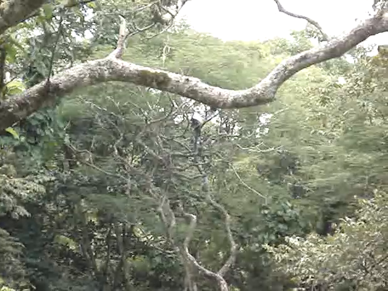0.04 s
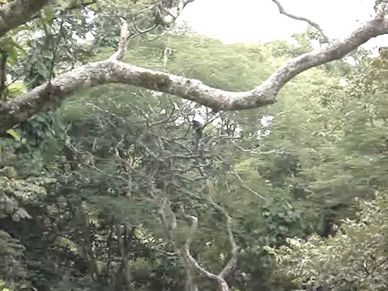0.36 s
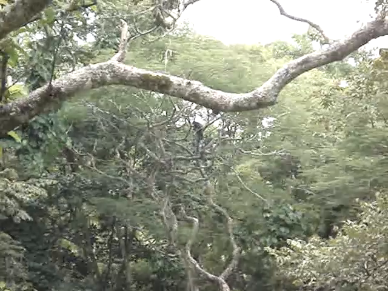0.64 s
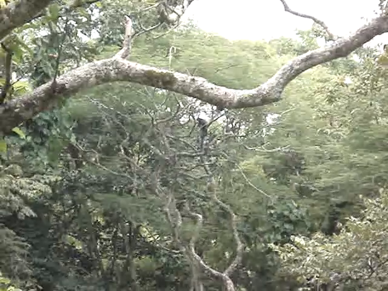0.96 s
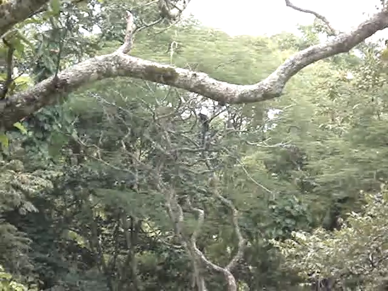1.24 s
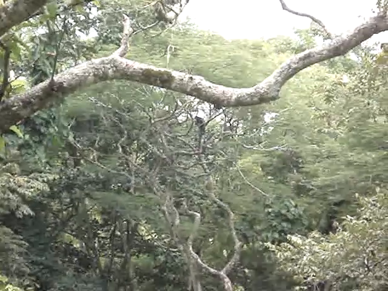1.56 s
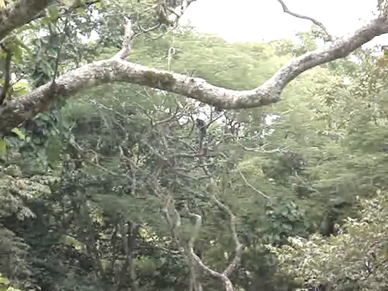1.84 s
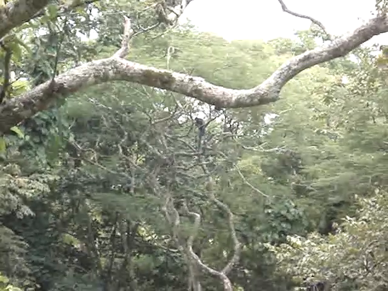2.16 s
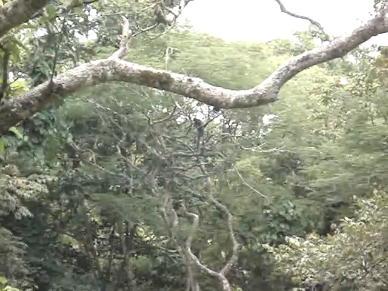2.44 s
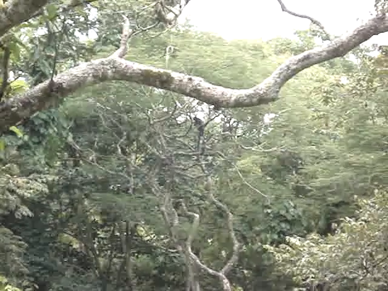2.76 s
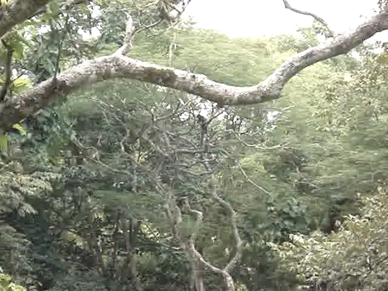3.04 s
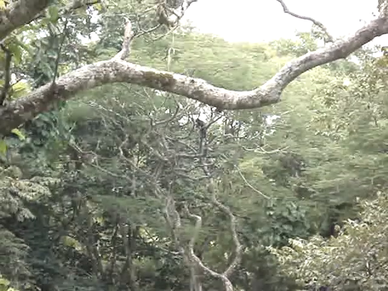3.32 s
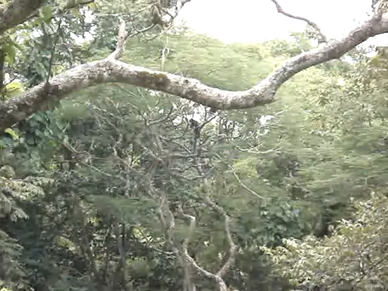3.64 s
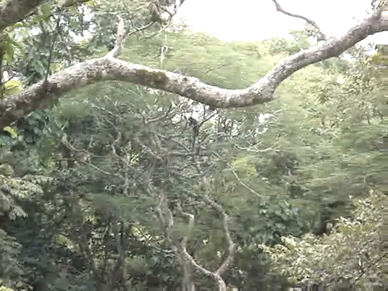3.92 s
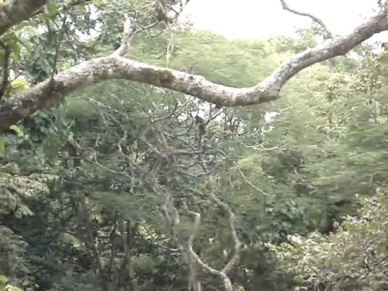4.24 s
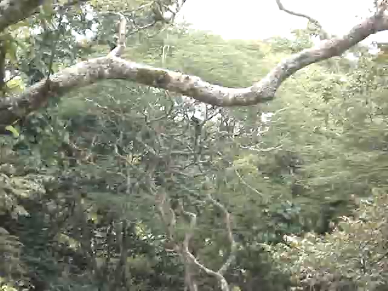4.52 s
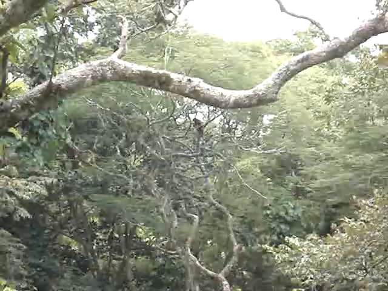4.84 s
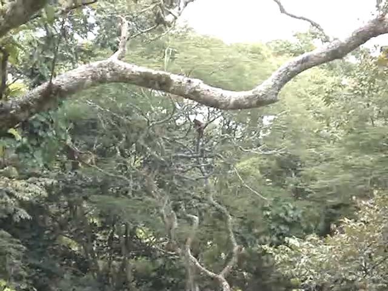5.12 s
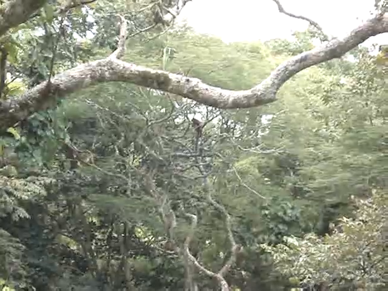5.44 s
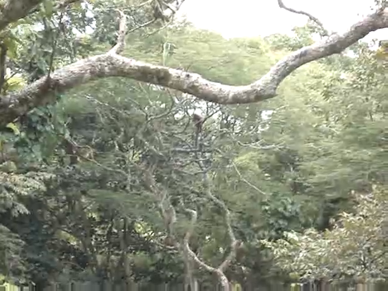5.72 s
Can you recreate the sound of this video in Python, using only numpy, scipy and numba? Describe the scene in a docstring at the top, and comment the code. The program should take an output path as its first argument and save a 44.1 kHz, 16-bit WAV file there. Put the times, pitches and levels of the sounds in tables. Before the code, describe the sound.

A soft, steady forest hiss runs for the whole six seconds, with a very faint low engine drone far away that slowly speeds up. During the first two seconds small birds give quiet, quick, high chirps, and leaves swish briefly around 1 and 2 seconds. Thin whistles follow near 2.4 seconds. At about 2.8 seconds a howler monkey starts roaring from a tree some way off, clearly the loudest sound. Its calls are short, hoarse and raspy, each with a fluttering, hollow boom and a light echo from the trees. The opening pair runs together with a thin high ring; more come at about 3.4, 3.6, 4.0, 4.2 and 4.6 seconds, the last ones slightly lower and rougher. A brighter bird chirp cuts through near 3.7 seconds. The roaring fades by 5 seconds, leaving the hiss, a couple of thin whistles and a last leaf swish.

```python
"""Howler monkey in a forest

A howler gives a bout of hoarse roars from a tree some way off. Its throat sac booms in throbs while
chaotic vocal-fold pulses rasp through the throat and mouth resonances; the trees scatter the sound.
Its mouth adds a thin high ring to the opening roars.
Small birds chirp and whistle, leaves swish, a far engine slowly speeds up, and hiss lies under it all."""
import sys
import numpy as np
from scipy import signal
from scipy.fft import rfft, irfft
from scipy.io import wavfile
from scipy.ndimage import uniform_filter1d
from numba import njit

SR = 44100
rng = np.random.default_rng(int(sys.argv[2]) if len(sys.argv) > 2 else 0)


def unload_audio(sound):
    """Save the sound as a 16-bit wav file, at the path given as the first command line argument."""
    columns = np.transpose(np.atleast_2d(sound))
    # keep every value between -1 and 1, then stretch to whole-number steps
    steps = np.round(np.clip(columns, -1, 1) * 32767)
    wavfile.write(sys.argv[1], SR, steps.astype(np.int16))


N = 263718
TIME_S = np.arange(N) / SR

# forest hiss spectrum: f/Hz, relative density/dB
HISS_SPECTRUM = [(20, -22.5), (60, -12), (120, -8), (240, -8.5), (330, -5), (460, -8.5), (870, -7.5),
                 (1700, -8.5), (2760, -7.5), (4440, -10.5), (6300, -11), (7500, -12), (8200, -16),
                 (10000, -27.5)]
# gain of hiss and insects: t/s, level/dB
AMBIENCE_GAIN = [(0, -45.5), (1.8, -45.8), (2.1, -45), (2.9, -46), (4.3, -44), (6, -46)]
# engine loudness: t/s, level/dB
ENGINE_GAIN = [(0.0, -65), (0.11, -62), (0.2, -55), (2.15, -55.5), (2.61, -51.5), (5.55, -56.5),
               (5.64, -55.5), (5.9, -58)]
# exhaust pipe resonance: t/s, f/Hz
PIPE_RESONANCE = [(.45, 134), (1.0, 156), (1.7, 166), (2.5, 146), (3.5, 149), (4.5, 166.3), (6, 163)]
# leaf swishes: centre t/s, level/dB, length/s, bright peak f/Hz
LEAF_SWISHES = [(0.07, -38, 0.029, 5500), (0.99, -37.5, 0.036, 5600), (1.077, -36, .045, 4600),
                (1.412, -37.5, 0.04, 5930), (2.017, -36.5, 0.038, 5050), (2.171, -37.5, 0.074, 5170),
                (2.623, -47, 0.14, 2820), (3.74, -39, 0.038, 5750), (4.446, -40, 0.11, 4600),
                (5.073, -44, 0.06, 5570), (5.79, -40.5, 0.077, 5600)]
# bird chirps: start t/s, length/s, mid-note f/Hz, glide/octaves, relative level/dB
BIRD_CHIRPS = [(.31, 0.12, 3770, 0, -50), (.405, 0.041, 2750, -0.44, -39.5),
               (.475, 0.066, 2480, 0.053, -44), (.6, 0.058, 3190, -0.091, -41.5),
               (.64, 0.047, 2760, 0, -45), (.684, 0.033, 3305, -0.29, -36.5),
               (.72, 0.035, 3110, -0.33, -44.5), (.835, 0.067, 4380, -.08, -53.5),
               (1.175, 0.066, 2555, -0.42, -48), (1.235, 0.053, 4000, 0.031, -46),
               (1.425, 0.032, 2740, 0, -48.5), (1.51, .05, 2790, -0.32, -47),
               (1.585, 0.072, 2455, 0.23, -49), (1.715, 0.085, 2830, -0.16, -49.5),
               (1.805, 0.049, 2400, 0.26, -47), (2.56, 0.15, 3880, 0.37, -50.5),
               (2.65, 0.043, 2840, 0.083, -46), (3.652, 0.051, 3540, -0.1, -36),
               (3.72, 0.063, 3385, -0.134, -41.5), (4.2, 0.052, 2694, -0.24, -47.5),
               (4.75, 0.047, 4100, 0.42, -46), (4.8, 0.061, 2580, -.15, -49),
               (4.875, 0.045, 2566, 0.12, -45)]
# bird whistles and, at 2.88 s, the thin high ring of the howler's mouth in its opening roars:
# start t/s, length/s, mid-note f/Hz, glide/octaves, relative level/dB
CLEAR_TONES = [(2.393, 0.074, 3930, 0.093, -42), (2.47, 0.18, 4450, 0, -45), (2.88, .16, 4690, 0.09, -49),
               (3.4, 0.11, 3520, -0.0096, -40), (3.717, .06, 3370, -0.044, -32.5),
               (3.75, 0.14, 3400, 0.0024, -55), (5.22, .09, 4350, 0, -45),
               (5.609, 0.34, 4160, -0.065, -45.5)]
# rasp and upper mouth resonances, both tables: f/Hz, width/Hz, relative level/dB
RASP_RESONANCES = [(376, 118, 11), (546.5, 37, 3.5), (680, 68, -31)]
MOUTH_RESONANCES = [(1940, 69, -9), (2187, 56, -13.5), (2815, 89, -11), (3610, 110, -10), (4640, 400, -8)]
# throat resonance, sinking and roughening mid-bout: t/s, f/Hz, jitter/fraction
THROAT_RESONANCE = [(3.9, 719.6, 0.0259), (4.3, 687, 0.047)]
# roars: start t/s, length/s, rasp level/dB, throat level/dB, mouth level/dB, mouth f/Hz,
# boom start t/s, boom length/s, boom level/dB
ROAR_BOUT = [(2.8, .03, -52, -45, -58, 1180, 2.81, .025, -47.5),
             (2.856, 0.053, -36, -32, -43.5, 1147, 2.924, 0.043, -27),
             (2.98, .165, -33.5, -30.5, -40.5, 1135, 2.977, 0.16, -21.5),
             (3.419, 0.077, -32.5, -32.5, -43, 1128, 3.378, .15, -23),
             (3.629, 0.085, -38.5, -30, -41.5, 1110, 3.615, 0.13, -23.5),
             (3.961, .057, -28.5, -32, -39, 1153, 3.997, .155, -25),
             (4.226, .06, -32.5, -32, -43, 1180, 4.198, 0.16, -25.5),
             (4.583, .088, -30, -32, -43.5, 1181, 4.575, 0.18, -28.5)]


def undb(db):
    """Decibels to gain."""
    return 10 ** (np.asarray(db) / 20)


def unit(x):
    """Scale to rms 1."""
    return x / np.sqrt(np.mean(x ** 2))


def noise():
    """White noise, rms 1."""
    return rng.standard_normal(N)


def curves(table):
    """Columns interpolated over the first, t/s."""
    t_s, *columns = np.transpose(table)
    return [np.interp(TIME_S, t_s, column) for column in columns]


def wander(rate_hz):
    """Smooth random drift up to about rate_hz, rms 1."""
    return unit(irfft(rfft(noise()) * np.exp(-(np.fft.rfftfreq(N, 1 / SR) / rate_hz) ** 2), N))


def swell(centre_s, length_s):
    """Bell envelope, length_s wide at half power."""
    return np.exp(-2 * np.log(2) * ((TIME_S - centre_s) / length_s) ** 2)


def tone(hz):
    """Sine on a moving pitch, rms 1."""
    return np.sqrt(2) * np.sin(2 * np.pi * np.cumsum(hz) / SR)


@njit
def bandpass(x, hz, width_hz):
    """State-variable band-pass, moving centre, peak gain 1."""
    y, band, low = np.empty(len(x)), 0., 0.
    for i in range(len(x)):
        g, damping = np.tan(np.pi * hz[i] / SR), width_hz / hz[i]
        v = (band + g * (x[i] + 1e-18 - low)) / (1 + g * (g + damping))
        band, low, y[i] = 2 * v - band, low + 2 * g * v, damping * v
    return y


def ring(x, hz, width_hz):
    """Steep resonance: two band-passes in series, rms 1."""
    hz, width_hz = hz * np.ones(N), float(width_hz)
    return unit(bandpass(bandpass(x, hz, width_hz), hz, width_hz))


def steady(x):
    """Even out the level over 18 ms; faster flutter stays."""
    return x / np.sqrt(uniform_filter1d(x ** 2, size=SR // 55) + 1e-4)


def scatter(x, t60_s, onset_s):
    """Dense echoes from trunks and leaves, power gain 1."""
    t = TIME_S[:SR * 3 // 2]
    build_up = 1 - np.exp(-(t / onset_s) ** 2)
    echoes = rng.standard_normal(len(t)) * build_up * np.exp(-np.log(1000) * t / t60_s)
    return signal.fftconvolve(x, echoes / np.sqrt(np.sum(echoes ** 2)))[:N]


def forest():
    """Slightly wavering hiss and insect bands, low rumble, one soft deep bump."""
    hiss_hz, hiss_db = np.transpose(HISS_SPECTRUM)
    log_hz = np.log(np.fft.rfftfreq(N, 1 / SR) + 1)
    hiss = unit(irfft(rfft(noise()) * undb(np.interp(log_hz, np.log(hiss_hz), hiss_db)), N))
    level_db, = curves(AMBIENCE_GAIN)
    insects = sum(undb(db + 1.4 * wander(8.3)) * ring(noise(), hz, width_hz)
                  for hz, width_hz, db in [(2570, 1200, -15.5), (4510, 1600, -8.5), (7450, 120, -16)])
    rumble = undb(-66.5 + 2 * wander(3)) * ring(noise(), hz=77, width_hz=25)
    bump = undb(-59) * swell(centre_s=1.3, length_s=0.12) * ring(noise(), hz=48, width_hz=50)
    return (hiss + insects) * undb(level_db + 0.88 * wander(46)) + rumble + bump


def engine(start_hz=23.56, speed_up_hz_per_s=1.12):
    """Far exhaust thuds; only harmonics near the pipe resonance carry through the forest."""
    firing_hz = start_hz + speed_up_hz_per_s * TIME_S
    level_db, = curves(ENGINE_GAIN)
    pipe_hz, = curves(PIPE_RESONANCE)
    phase = 2 * np.pi * np.cumsum(firing_hz) / SR
    thuds = sum(np.exp(-((k * firing_hz - pipe_hz) / 38) ** 2) * np.cos(k * phase) for k in range(3, 10))
    return unit(thuds) * undb(level_db + 0.34 * wander(17))


def leaves(cutoff_hz=7200):
    """Crowds of tiny scrapes; air and foliage take off the top."""
    grains = noise() * undb(3 * wander(500))
    bright_hz, = curves([(t_s, hz) for t_s, _, _, hz in LEAF_SWISHES])
    strength = sum(undb(db) * swell(t_s, length_s) for t_s, db, length_s, _ in LEAF_SWISHES)
    peak = ring(grains, bright_hz, width_hz=1800)
    body = undb(-4) * ring(rng.permutation(grains), hz=3800, width_hz=3400)
    return strength * unit(signal.sosfilt(signal.butter(5, cutoff_hz, fs=SR, output="sos"), peak + body))


def far_chirps(count):
    """Random faint notes of distant birds, as BIRD_CHIRPS rows."""
    return [(start * N / SR, 0.037 + 0.065 * length, 2500 + 2100 * pitch,
             0.316 * (glide - 0.5), -60 + 5 * level)
            for start, length, pitch, glide, level in rng.random((count, 5))]


def glides(table, jitter, dip_oct=0):
    """Gliding, trembling sine notes; pitch sags mid-note by dip_oct."""
    out, tremble = np.zeros(N), 1 + jitter * wander(344)
    for start_s, length_s, mid_hz, glide_oct, db in table:
        span = (TIME_S >= start_s) & (TIME_S < start_s + length_s)
        progress = (TIME_S[span] - start_s) / length_s
        octaves = glide_oct * (progress - 0.5) + dip_oct * np.abs(2 * progress - 1)
        out[span] += undb(db) * np.sin(np.pi * progress) * tone(mid_hz * 2 ** octaves * tremble[span])
    return out


def birds_and_mouth_ring():
    """Bird chatter blurred by foliage, whistles, the howler's thin mouth ring; far trees echo all."""
    chatter = glides(BIRD_CHIRPS, jitter=0.0864, dip_oct=0.1007)
    chatter += glides(far_chirps(count=80), jitter=0.03)
    clear_tones = glides(CLEAR_TONES, jitter=0.018)
    blur = scatter(chatter, t60_s=0.085, onset_s=0.00068)
    echoes = scatter(chatter + clear_tones, t60_s=0.32, onset_s=0.02)
    return undb(-5) * chatter + undb(2.5) * blur + undb(-3) * clear_tones + undb(-8) * echoes


def bout(starts_s, lengths_s, levels_db, release_s, attack_s=0.03, swell_db_per_s=16):
    """Envelope of a row of calls: each swells to its level, then decays; the strongest prevails."""
    strength = np.zeros(N)
    for start_s, length_s, db in zip(starts_s, lengths_s, levels_db):
        age_s = TIME_S - start_s
        attack = np.clip(age_s / attack_s, 0, 1)
        growth = undb(db + swell_db_per_s * np.clip(age_s - length_s, -length_s, 0))
        release = np.exp(-np.maximum(age_s - length_s, 0) / release_s)
        strength = np.maximum(strength, attack * growth * release)
    return strength


def sac_throbs(starts_s, rate_hz=18.4, depth=0.91, settle_s=0.29):
    """Sac flutter, restarted by each boom: deep at first, then evening out."""
    latest = np.maximum(np.searchsorted(starts_s, TIME_S) - 1, 0)
    age_s = np.maximum(TIME_S - starts_s[latest], 0)
    return 1 - depth * np.exp(-age_s / settle_s) * np.cos(np.pi * rate_hz * age_s) ** 4


def sac_boom(sac_hz, sac_drive, throat_drive):
    """Sac and throat sing together; each throb starts sharp and sags as pressure falls."""
    throat_hz, jitter = curves(THROAT_RESONANCE)
    pressure_trend = np.tanh(np.gradient(np.log(sac_drive + 1e-3)) * SR / 60)
    bend = 1 + 0.014 * pressure_trend + 0.01483 * wander(87)
    throat = tone(throat_hz * bend * (1 + jitter * wander(131.5)))
    return sac_drive * tone(sac_hz * bend) + throat_drive * throat


def vocal_folds(rate_hz, spread_db=7, cutoff_hz=300):
    """Irregular slaps plus rushing air; little radiates below the sac resonance."""
    cycles = np.cumsum(rate_hz * np.exp(0.2 * wander(150))) / SR
    closures = np.diff(np.floor(cycles), prepend=0)
    slaps = unit(closures * undb(spread_db * np.clip(noise(), -2, 2)))
    highpass = signal.butter(4, cutoff_hz, "high", fs=SR, output="sos")
    return signal.sosfilt(highpass, slaps + 0.25 * noise())


def formants(folds, table):
    """Fixed vocal-tract resonances in parallel."""
    return sum(undb(db) * ring(folds, hz, width_hz) for hz, width_hz, db in table)


def monkey(rest_hz=352.6, pitch_rise=0.035, breakup=0.43):
    """Throbbing boom and chaotic rasp; with effort the boom rises in pitch and gives way to the rasp."""
    (start_s, length_s, rasp_db, throat_db, mouth_db, mouth_hz,
     boom_start_s, boom_length_s, boom_db) = np.transpose(ROAR_BOUT)
    rasp_drive = bout(start_s, length_s, rasp_db, release_s=0.045)
    effort = rasp_drive / rasp_drive.max()
    sac_hz = rest_hz * (1 + pitch_rise * effort)

    throbs = sac_throbs(boom_start_s)
    sac_drive = throbs * bout(boom_start_s, boom_length_s, boom_db, release_s=0.041, attack_s=0.021)
    sing_drive = throbs * bout(boom_start_s, boom_length_s, boom_db - 12, release_s=0.15, attack_s=0.021)
    boom = sac_boom(sac_hz, sac_drive * (1 - breakup * effort), sing_drive)

    folds = vocal_folds(rate_hz=sac_hz / 2)
    rasp = steady(formants(folds, RASP_RESONANCES)) * rasp_drive

    throat_hz, _ = curves(THROAT_RESONANCE)
    throat = steady(ring(folds, throat_hz, width_hz=58.4))
    throat *= bout(start_s, length_s, throat_db, release_s=0.069)
    throat *= throbs ** 0.76 * undb(1.5 * wander(22))

    formant_hz = np.interp(TIME_S, start_s + length_s / 2, mouth_hz) * (1 + 0.011 * wander(14))
    mouth = steady(ring(folds, formant_hz, width_hz=75)) + undb(-1.5) * formants(folds, MOUTH_RESONANCES)
    mouth *= bout(start_s, length_s, mouth_db, release_s=0.069)

    voice = boom + rasp + throat + mouth
    return voice + undb(-10) * scatter(voice, t60_s=0.52, onset_s=0.085)


def scene():
    """Mono mix on two channels."""
    return np.tile(monkey() + birds_and_mouth_ring() + leaves() + engine() + forest(), (2, 1))


def record(dry, cutoff_hz=10050):
    """Steep low-pass."""
    return signal.sosfilt(signal.ellip(12, 0.2, 80, cutoff_hz, fs=SR, output="sos"), dry)


dry = scene()
out = record(dry)
unload_audio(out)
```